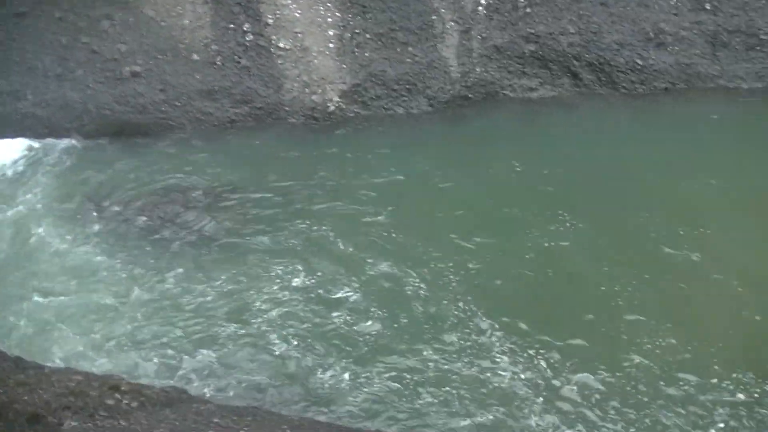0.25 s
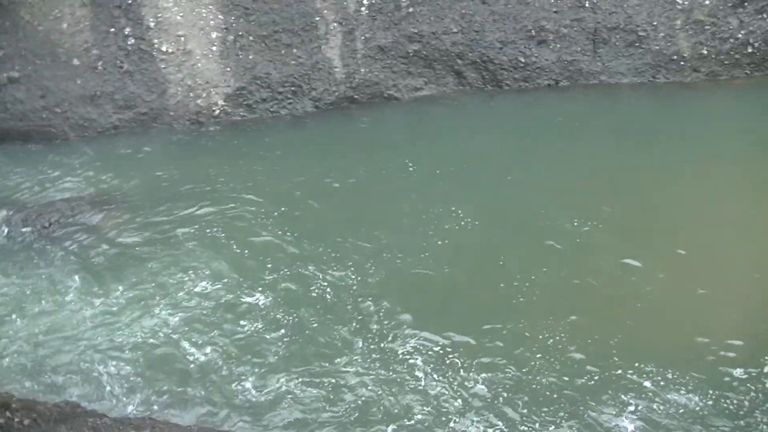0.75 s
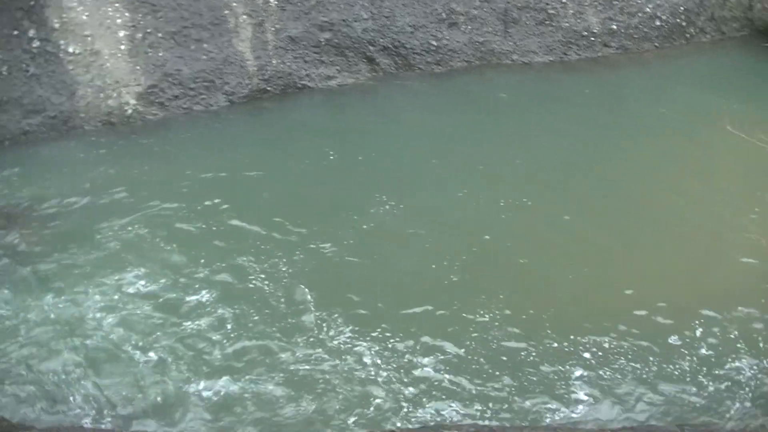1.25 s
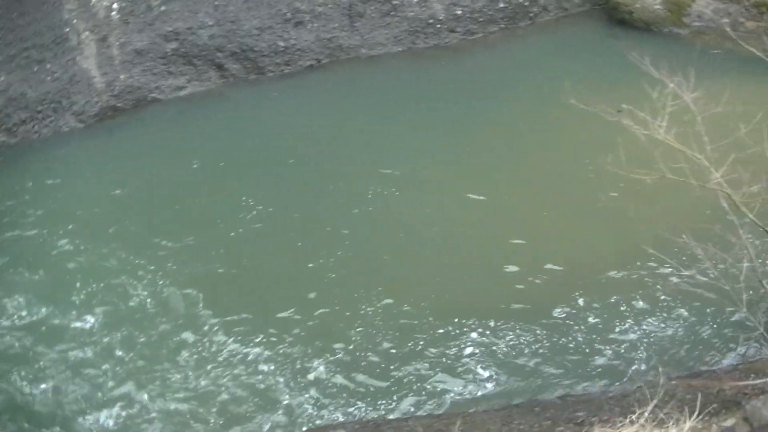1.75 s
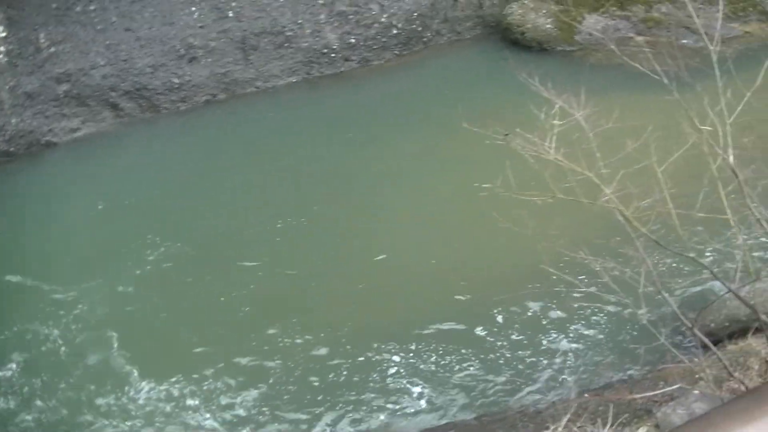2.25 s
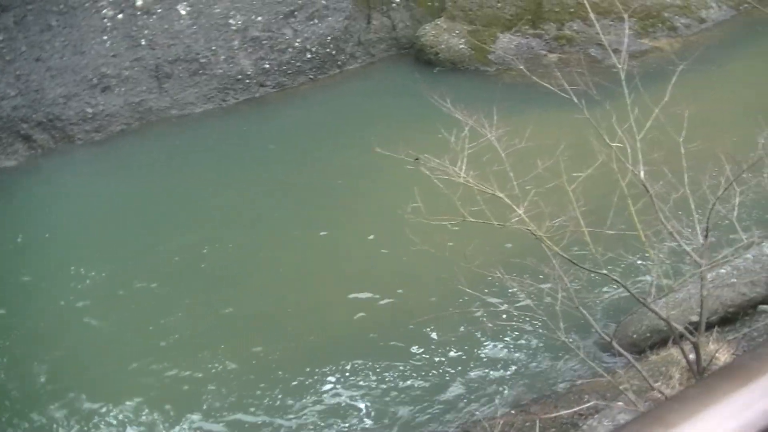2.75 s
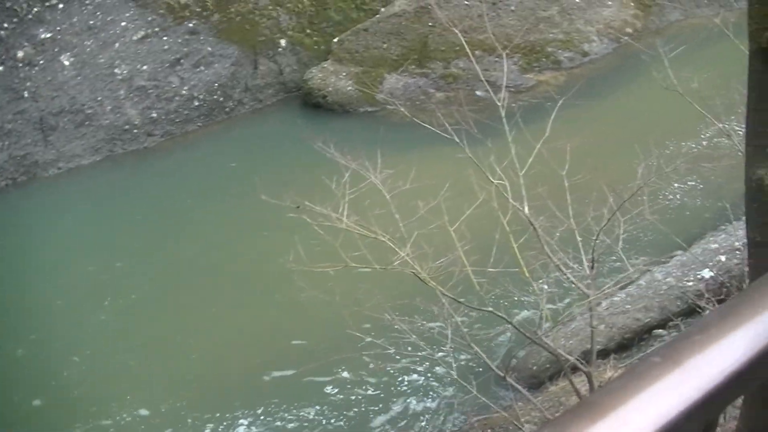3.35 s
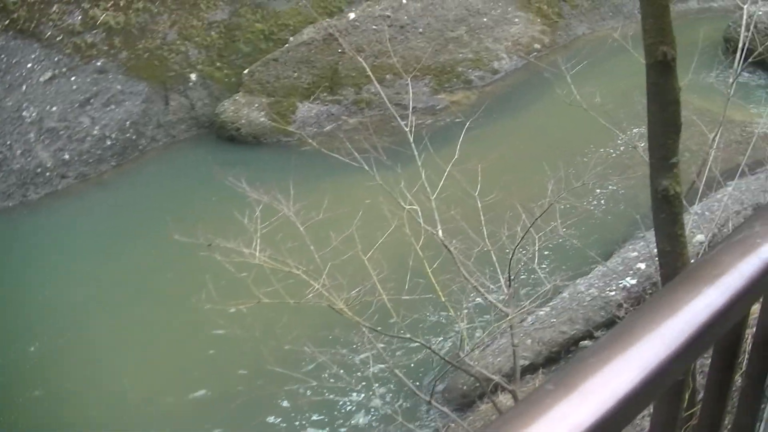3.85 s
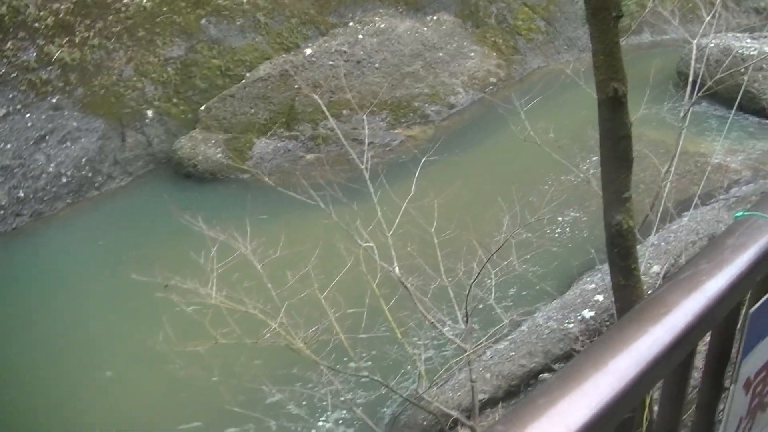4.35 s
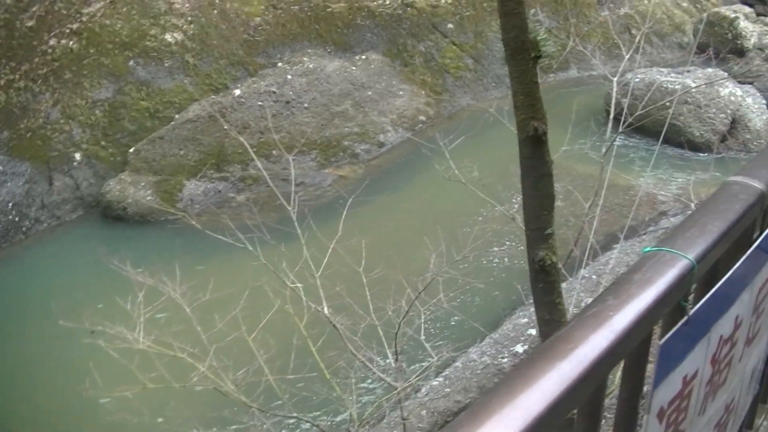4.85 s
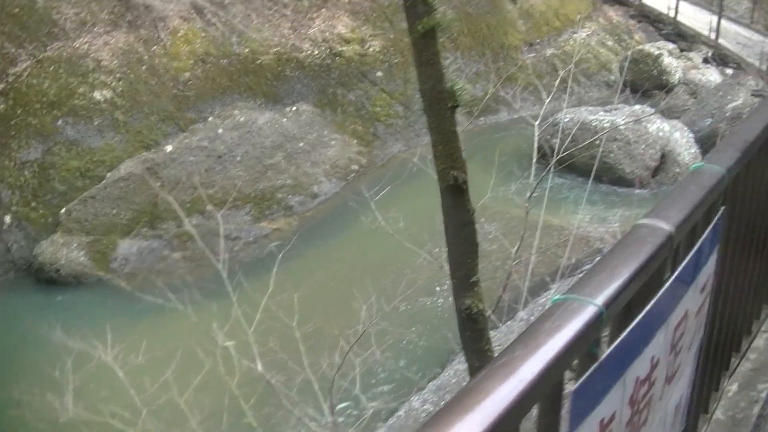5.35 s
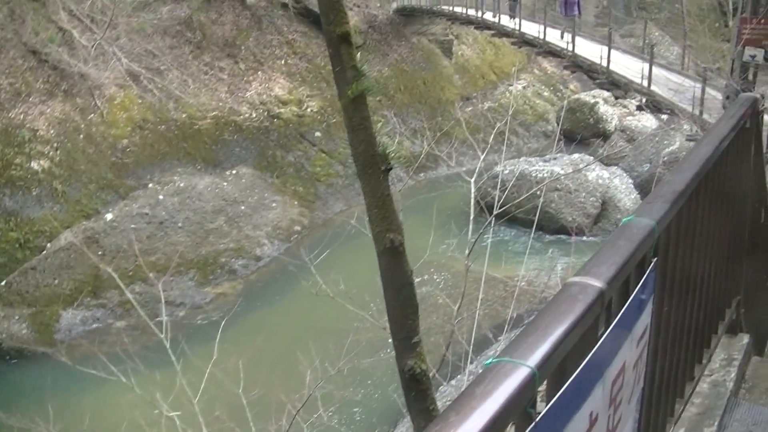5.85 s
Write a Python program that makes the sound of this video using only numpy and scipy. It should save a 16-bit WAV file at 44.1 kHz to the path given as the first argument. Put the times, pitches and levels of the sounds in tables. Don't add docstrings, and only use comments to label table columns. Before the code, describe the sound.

A large waterfall pours into a gorge pool, a continuous dense roar with strong bright hiss and little deep bass. It is fullest in the first second, then eases by barely two decibels as the small stereo camera turns away. The tone shifts subtly during the turn. Faint, low wind puffs touch the microphones, mostly in the first half second.

```python
import sys
import numpy as np
from scipy import signal
from scipy.fft import rfft, irfft, next_fast_len
from scipy.io import wavfile
from scipy.ndimage import uniform_filter1d, map_coordinates

SR = 44100
rng = np.random.default_rng(int(sys.argv[2]) if len(sys.argv) > 2 else 0)


def elevation(decibels):
    levels = np.asarray(decibels, float)
    return 10 ** (levels / 20)


def unload_wav(signal):
    wavfile.write(
        sys.argv[1],
        SR,
        np.round(np.clip(np.atleast_2d(signal).T, -1, 1) * 32767).astype(np.int16),
    )


N = 269451


def unit(x):
    return x / np.sqrt(np.mean(np.abs(x) ** 2) + 1e-20)


def along(points, hz):
    f, value = np.transpose(points)
    return np.interp(np.log(hz + 1), np.log(f + 1), value)


def coloured(x, points):
    size = next_fast_len(N + 8192)
    gain = elevation(along(points, np.fft.rfftfreq(size, 1 / SR)))
    return irfft(rfft(x, size) * gain, size)[:, :N]


def wobble(rate_hz):
    knots = rng.standard_normal(int(N * rate_hz / SR) + 4)
    return map_coordinates(knots, [np.arange(N) * rate_hz / SR])


# t/s, buffet level/dB
GUSTS = [
    (0, -62),
    (.4, -68),
    (1.75, -71),
    (5.7, -73),
]


def gust_db(t):
    calm_db, rise_db_per_s, fall_db_per_s = -82, 25, 45
    crests = [db - np.maximum(rise_db_per_s * (s - t), fall_db_per_s * (t - s)) for s, db in GUSTS]
    return np.maximum(calm_db, np.max(crests, axis=0))


# f/Hz, level/dB
BUFFET = [(25, -32), (70, -19), (120, -14), (170, 5), (300, -8), (500, -22), (900, -42)]


def buffeting():
    t = np.arange(N) / SR
    lumps = unit(elevation(7 * np.array([wobble(22), wobble(21.7)])))
    turbulence = unit(coloured(rng.standard_normal((2, N)), BUFFET))
    return turbulence * elevation(gust_db(t)) * lumps


# t/s, peak level/dB, f/Hz
PUFFS = [(.008, -53, 240), (.035, -46, 151), (.055, -58, 200), (.165, -50, 170), (.2, -52, 230),
         (.27, -62, 150), (.31, -58, 230), (.33, -51, 140), (.407, -58, 160), (.529, -58, 200),
         (1.19, -65, 150), (1.457, -64, 170), (1.627, -61, 140), (1.697, -58, 180), (1.739, -61, 160),
         (1.802, -61, 170), (1.98, -69, 130), (2.12, -72, 120), (2.597, -58, 180), (3.53, -72, 110),
         (3.854, -64, 180), (4.12, -68, 130), (4.7, -72, 130), (5.08, -56, 190), (5.72, -69, 150),
         (5.9, -70, 150)]
# t/s, peak level/dB
THUMPS = [
    (.458, -86),
    (1.187, -85),
    (1.508, -85),
    (5.391, -82),
    (5.52, -85),
]


def eddies():
    u = np.arange(-2000, 2000) / SR
    events = []
    for s, db, hz in PUFFS:
        left = -0.9 + 0.055 * max(db + 57, 0)
        events.append((s, db, hz, left))
    for s, db in THUMPS:
        events.append((s, db, 42, 0.6))

    ports = np.zeros((2, N + len(u)))
    for s, db, hz, left in events:
        bell = np.exp(-0.5 * (u * hz / 0.67) ** 2)
        swing = np.sin(2 * np.pi * hz * u) + 0.6 * np.cos(2 * np.pi * 1.8 * hz * u)
        left_right = [np.clip(left, -1, 1), 1]
        start = round(s * SR)
        ports[:, start:][:, :len(u)] += np.outer(left_right, elevation(db) * bell * swing)
    return ports[:, len(u) // 2:][:, :N]


def wind():
    return buffeting() + eddies()


# t/s, heading (0 facing the falls, 1 side-on, 2 away)
HEADING = [
    (0, 0.061),
    (1.0, 0),
    (1.8, 0.55),
    (2.6, 1.03),
    (3.6, 1.44),
    (4.4, 1.76),
    (6.11, 1.9),
]


def heading_at(t):
    s, heading = np.transpose(HEADING)
    return np.interp(t, s, heading)


def roar_db(heading):
    facing_db, shadow_db, fade_db = -34.5, 1.27, 0.27
    shadow_from, shadow_full = 0.1, 0.7
    shade = np.clip((heading - shadow_from) / (shadow_full - shadow_from), 0, 1)
    return facing_db - shadow_db * shade - fade_db * heading


def lobe(hz, heading, centre_hz, climb_hz, width_hz, lift_db, at, span):
    turn = heading - at
    off_centre = (hz[:, None] - centre_hz - climb_hz * turn) / width_hz
    return lift_db * np.exp(-0.5 * (turn / span) ** 2 - 0.5 * off_centre ** 2)


def by_heading(tables, hz, heading):
    share = np.clip(1 - np.abs(heading - np.arange(3)[:, None]), 0, 1)
    return np.transpose([along(table, hz) for table in tables]) @ share


# f/Hz, level/dB
FACING = [(950, -6.5), (1900, -5), (2500, -1), (3010, 0.1), (4390, -0.7), (4820, 0.4), (6120, -7.0),
          (7060, -7.5), (8440, -19), (9130, -25), (11280, -23), (13180, -32), (14130, -34), (15420, -38.6)]
SIDE_ON = [(950, -6), (1810, -5), (3100, -0.9), (4220, -3), (4910, -1.3), (5680, -6), (6500, -10),
           (7320, -8.5), (8440, -20), (10250, -28.5), (11970, -24), (13180, -33), (14380, -34),
           (15420, -40)]
AWAY = [(950, -6.5), (1890, -3), (3100, 0.34), (4310, -4), (4910, -3.0), (5510, -8.5), (6100, -5.5),
        (6980, -5.5), (7920, -11.5), (9990, -29), (11800, -26.5), (12580, -32), (13870, -31.1),
        (15420, -36.5)]


def spray_colour(hz, heading):
    colour_db = by_heading([FACING, SIDE_ON, AWAY], hz, heading)
    colour_db += lobe(hz, heading, centre_hz=14600, climb_hz=4000, width_hz=1050, lift_db=6, at=1.27, span=0.36)
    colour_db += lobe(hz, heading, centre_hz=9450, climb_hz=-300, width_hz=390, lift_db=3.5, at=1.2, span=0.22)
    colour = elevation(colour_db)
    colour = colour / np.sqrt(np.mean(colour ** 2, axis=0))
    field = rng.standard_normal(colour.shape)
    field = uniform_filter1d(uniform_filter1d(field, size=12, axis=0), size=4, axis=1)
    patchy_db = along([(300, 0.22), (3000, 0.13), (9000, 0.75), (14000, 1.9)], hz)[:, None]
    return colour * elevation(patchy_db * unit(field))


# f/Hz, coherence
ALIKE = [
    [(250, .995), (600, .97), (1800, .91), (3000, .96), (5000, .986), (7000, .965), (8600, .78),
     (10300, .93), (12800, .87), (13800, .998)],
    [(250, .995), (600, .94), (1800, .85), (3000, .93), (5000, .955), (6500, .89), (8000, .92),
     (10000, .76), (11600, .985), (14000, .999)],
    [(250, .995), (600, .91), (1800, .82), (3000, .89), (5500, .89), (7300, .972), (8600, .89),
     (10000, .68), (13100, .86), (13900, .998)],
]
# f/Hz, level/dB
LEAN = [
    [(200, 2.5), (700, 0), (1800, 3), (3000, 0.5), (4000, 1), (6000, 1), (7500, 0), (10000, 0), (12500, 1),
     (14000, 1)],
    [(200, 1), (700, 1), (1800, 3.5), (3000, 2.3), (4000, 0.5), (6000, 1.5), (8300, -.4), (9800, 3),
     (11500, -2), (14000, 3.5)],
    [(200, 0.5), (700, 1), (1800, 4), (3000, 2.4), (4200, 0.5), (6000, -0.2), (8300, -1.5), (10300, 3),
     (12500, -1), (13900, -1)],
]
# f/Hz, phase/rad
LEAD = [
    [(0, 0), (1460, 0.034), (2760, -0.23), (3530, 0.068), (7240, 0.028), (8180, 0.3), (9040, -0.0),
     (15300, -0.0)],
    [(0, -0.036), (1810, 0.0075), (3010, -0.049), (5430, 0.1), (7240, -0.1), (8270, 0.1), (8870, -0.2),
     (9730, 0.0), (10900, -0.27), (11900, -0.0), (15300, 0.0)],
    [(0, 0), (1030, 0.026), (2840, -0.24), (4650, 0.067), (6200, -0.12), (8100, 0.16), (9040, -0.1),
     (9730, 0.1), (10500, -0.16), (15300, 0.0)],
]


def stereo_image(a, b, hz, heading):
    spread = np.arccos(np.clip(by_heading(ALIKE, hz, heading), 0, 1)) / 2
    common = np.cos(spread) * a
    apart = np.sin(spread) * b
    tilt = elevation(by_heading(LEAN, hz, heading) / 2) * np.exp(0.5j * by_heading(LEAD, hz, heading))
    return [(common + apart) * tilt, (common - apart) / tilt]


# f/Hz, level/dB
LOW_CUT = [(30, -47), (50, -46), (60, -44), (90, -37), (160, -15), (290, -0.6), (460, -0.13), (960, 0.44)]


def waterfall():
    frame = 1024
    hz, t, (a, b) = signal.stft(rng.standard_normal((2, N)), SR, nperseg=frame)
    heading = np.clip(heading_at(t), 0, 2)
    colour = spray_colour(hz, heading)
    spectra = stereo_image(a * colour, b * colour, hz, heading)
    ports = signal.istft(spectra, SR, nperseg=frame)[1][:, :N]
    level_db = roar_db(heading_at(np.arange(N) / SR)) + 0.23 * wobble(7) + 0.46
    return unit(coloured(ports, LOW_CUT)) * elevation(level_db)


def scene():
    return wind() + waterfall()


def top_cut(x):
    return signal.sosfilt(signal.butter(12, 15740, fs=SR, output="sos"), x)


def record(dry):
    return top_cut(dry)


dry = scene()
out = record(dry)
unload_wav(out)
```